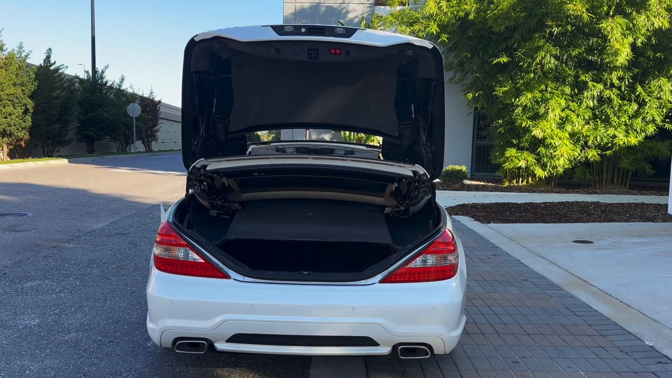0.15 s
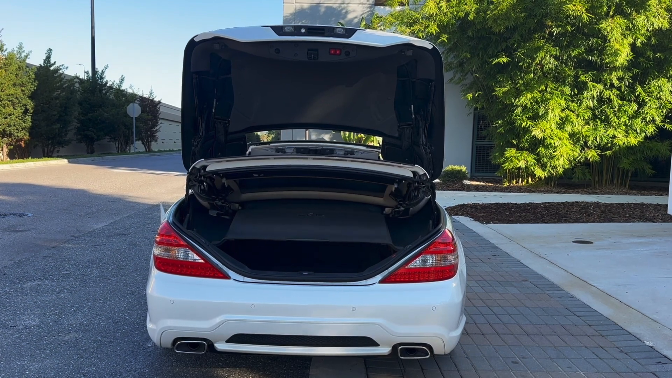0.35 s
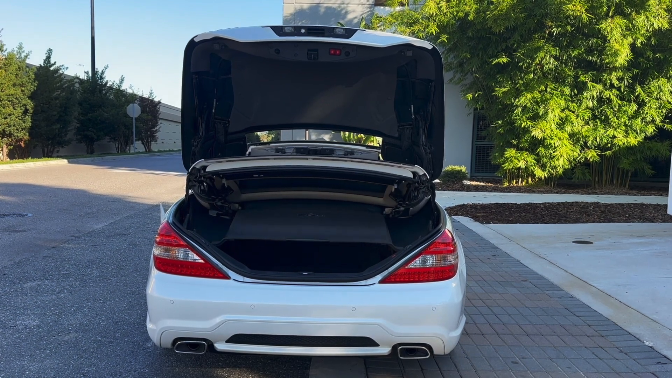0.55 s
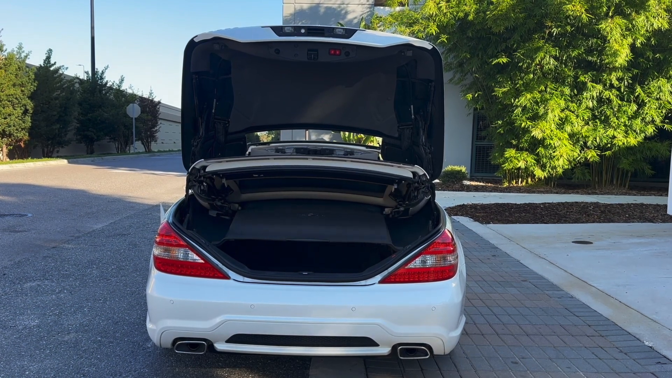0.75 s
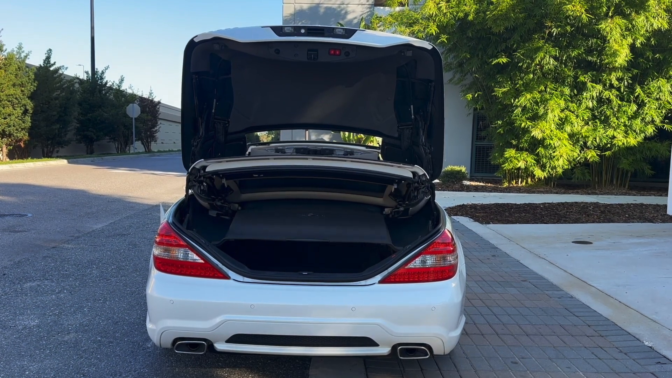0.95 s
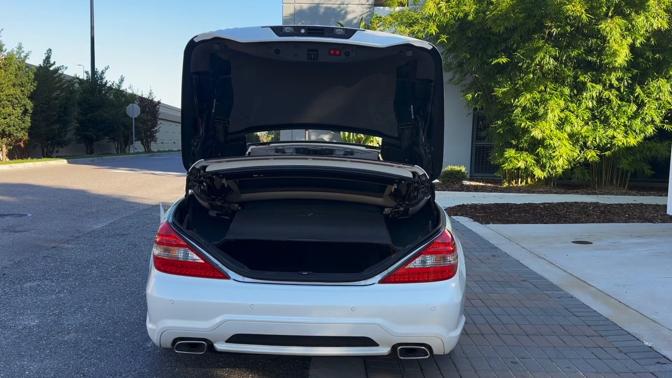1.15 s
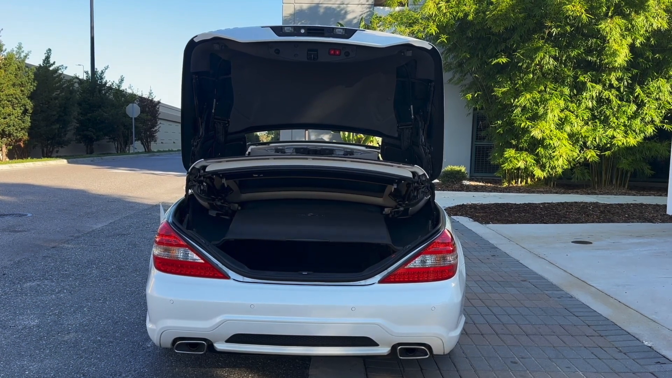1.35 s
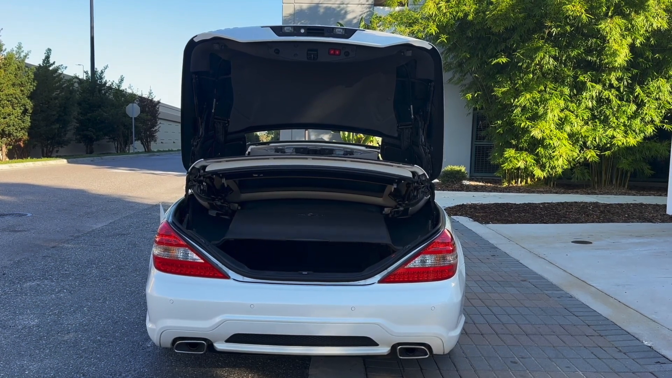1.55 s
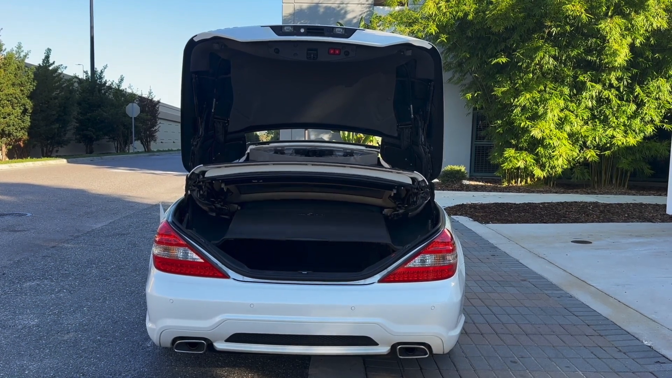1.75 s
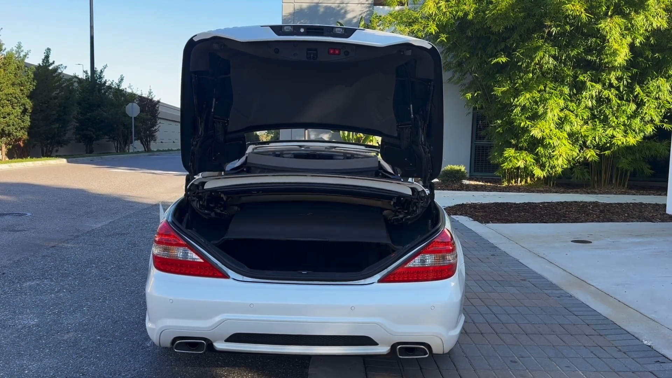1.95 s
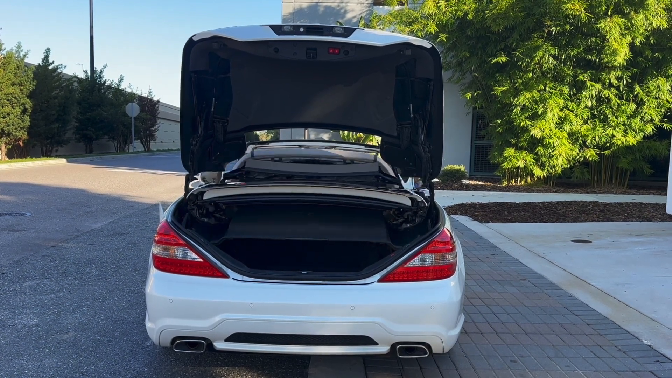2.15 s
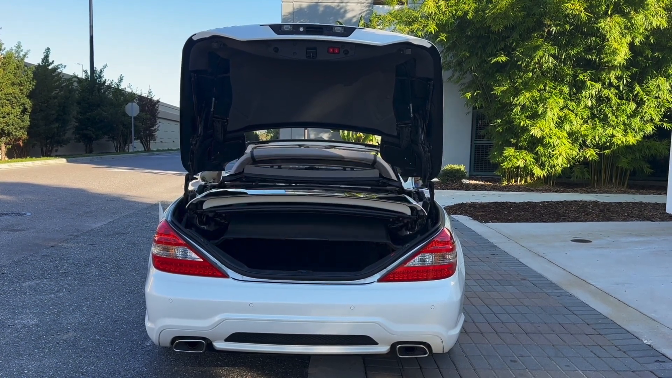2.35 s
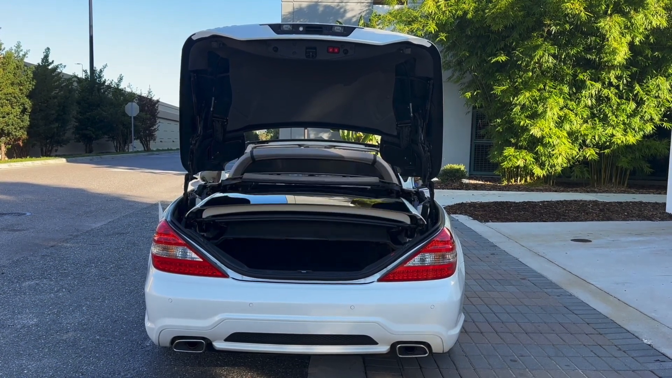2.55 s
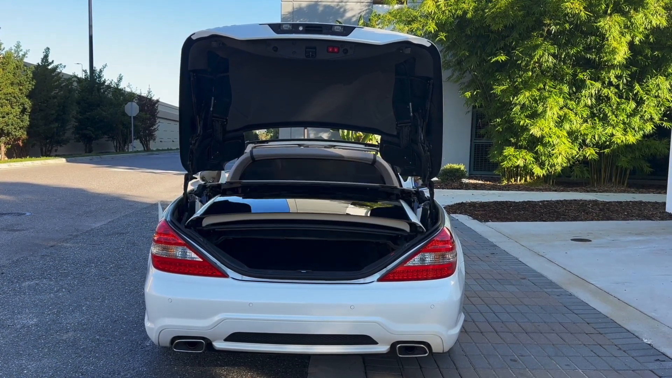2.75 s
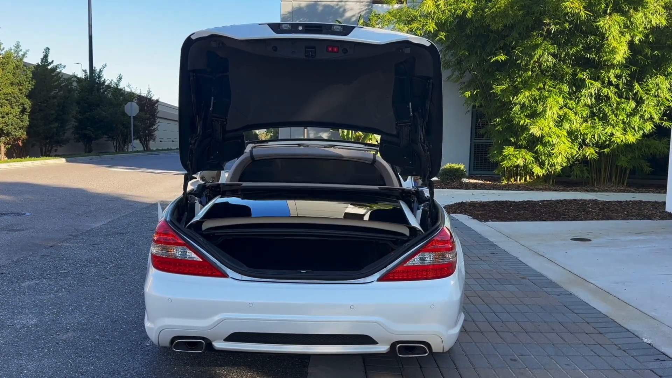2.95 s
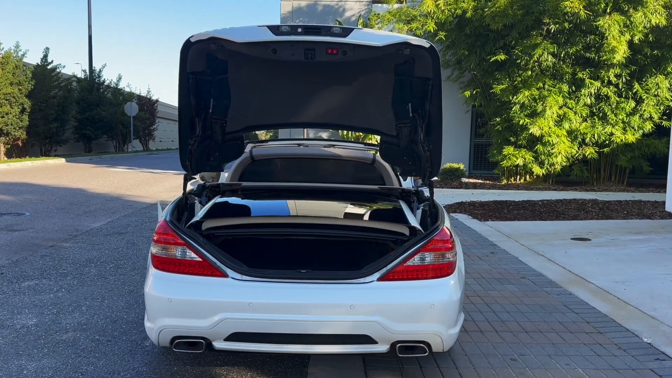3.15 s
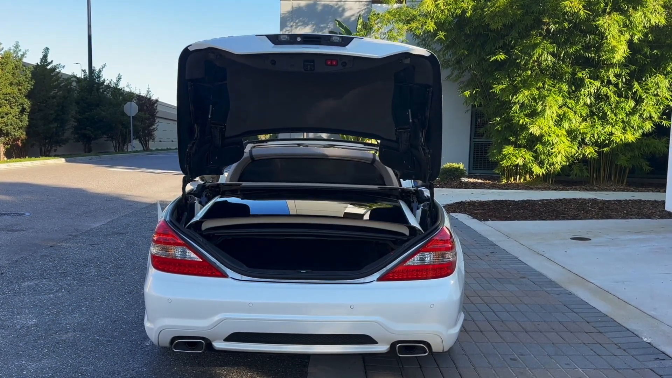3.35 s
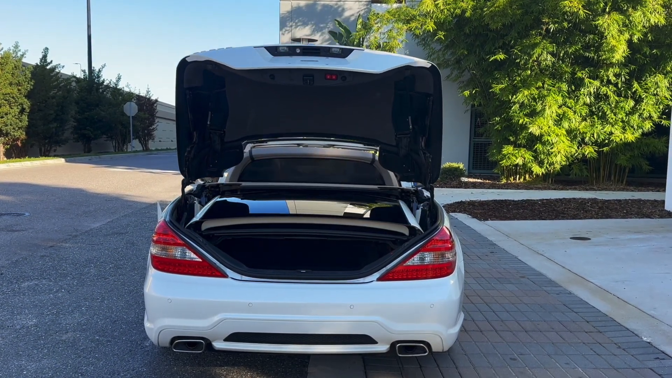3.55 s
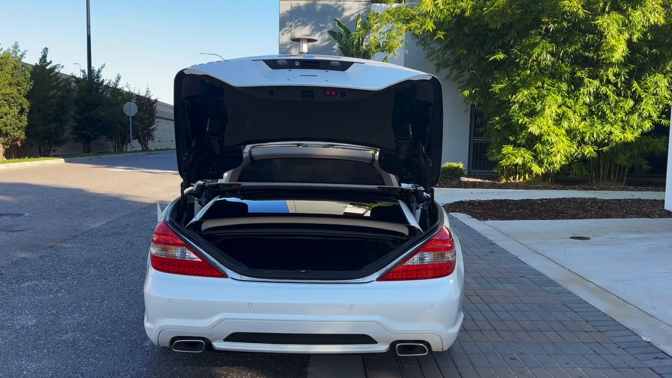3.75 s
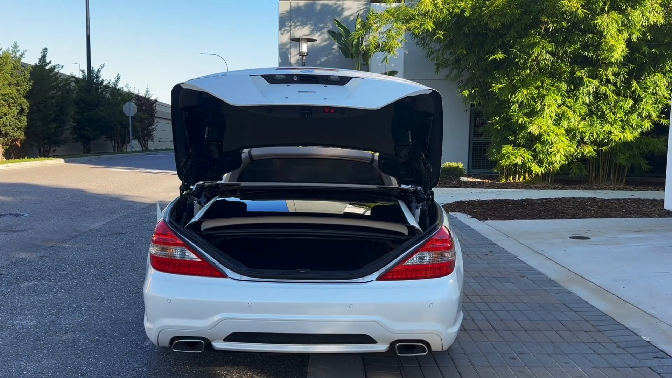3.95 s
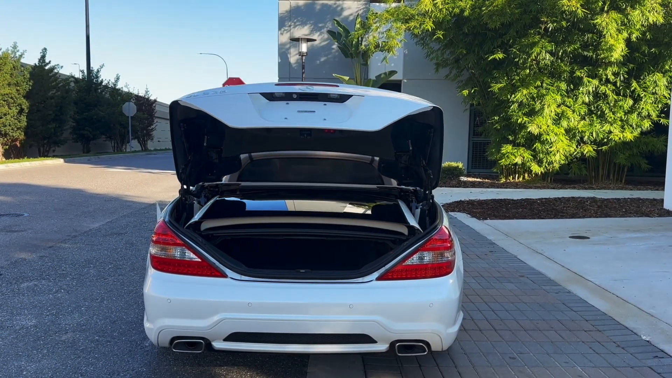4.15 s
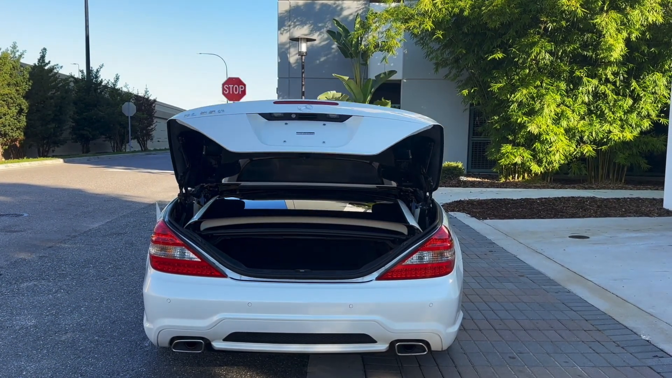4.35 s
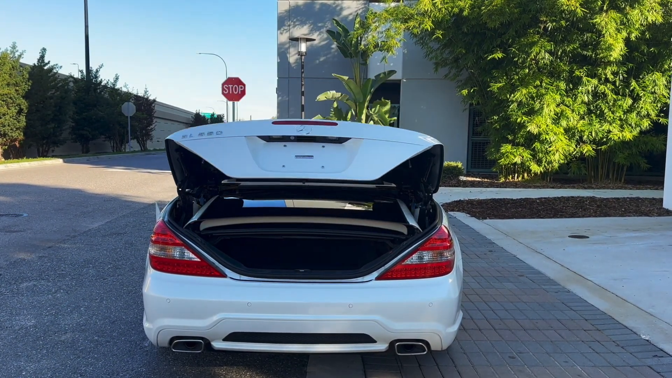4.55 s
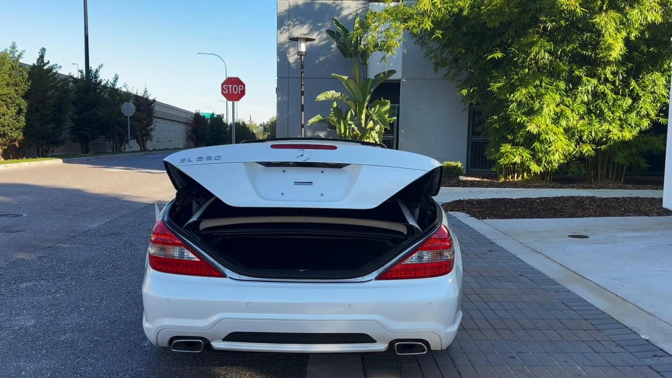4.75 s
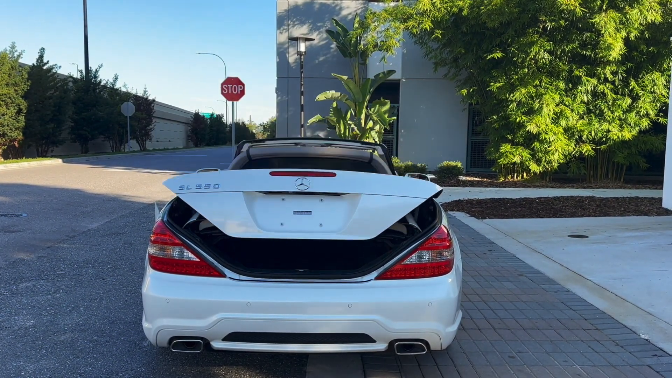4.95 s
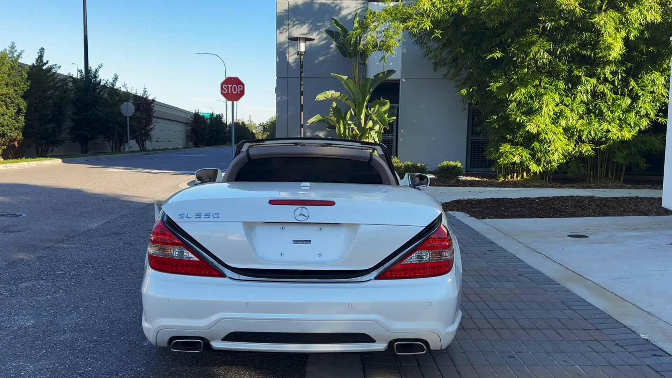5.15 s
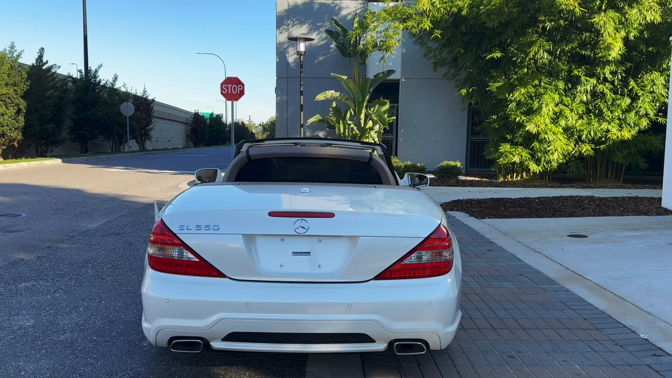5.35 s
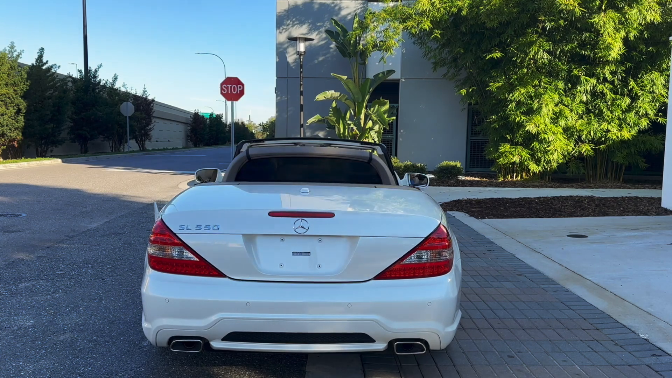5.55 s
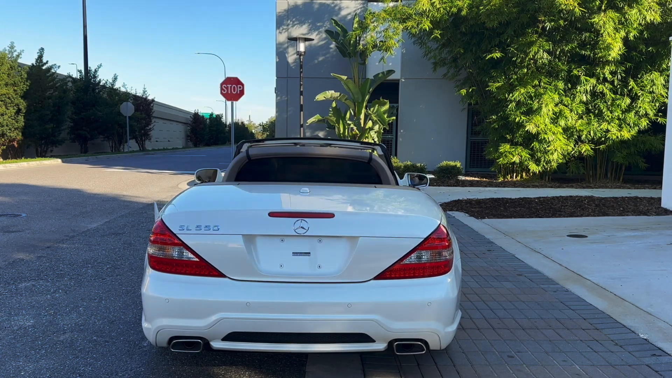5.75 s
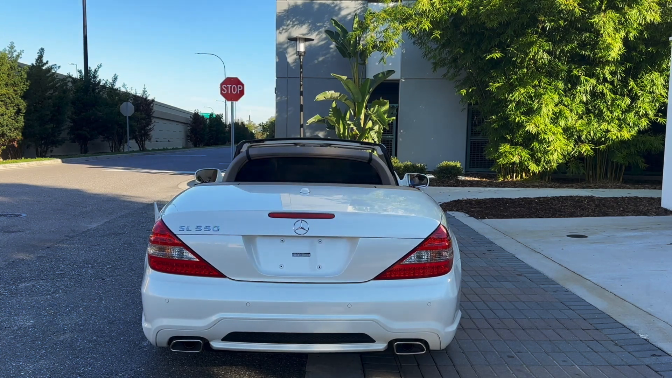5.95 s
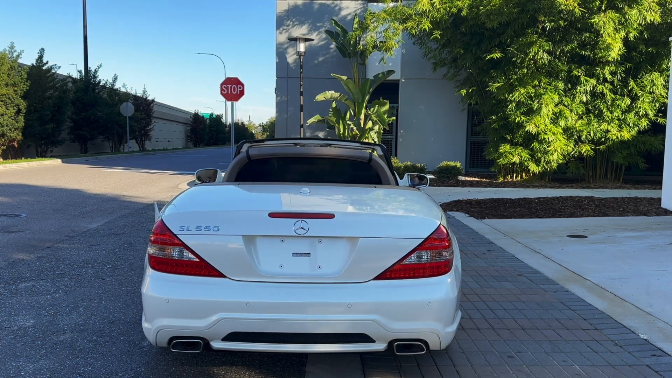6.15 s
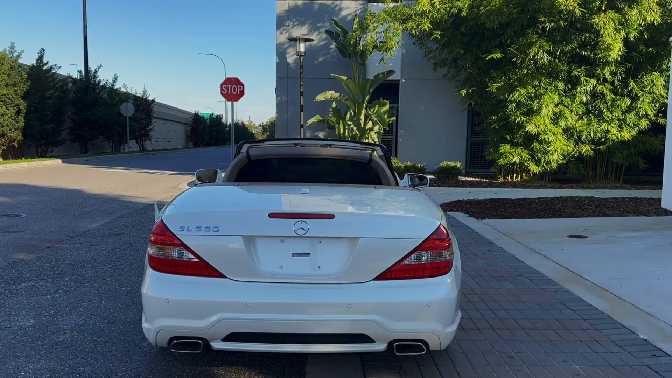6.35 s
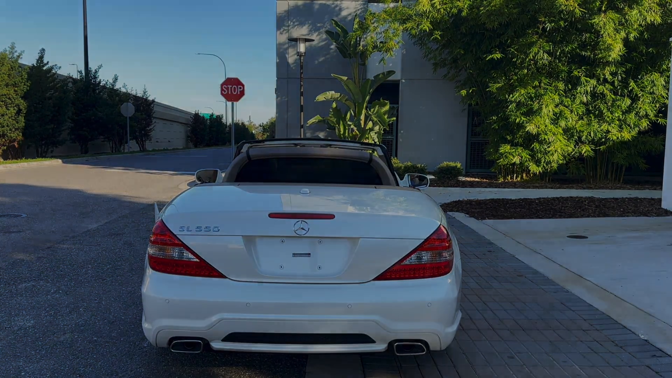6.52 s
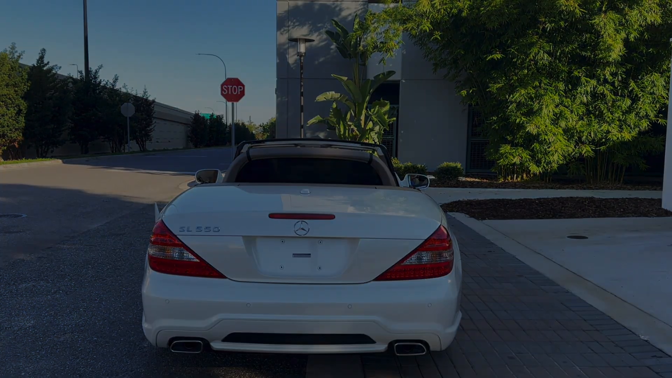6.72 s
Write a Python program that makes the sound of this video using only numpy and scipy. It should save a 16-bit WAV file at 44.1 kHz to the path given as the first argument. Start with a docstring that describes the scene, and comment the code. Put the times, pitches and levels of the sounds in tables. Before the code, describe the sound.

A low motor hum sags in pitch over a rumbling car idle outdoors, then a trunk lid slams with a deep thump and clicks once more.

```python
"""Convertible roof pump and trunk lid

A convertible idles in an open drive: a throbbing tone and shaped noise make the exhaust, fan and town air.
Its roof pump hums as a tone with an octave, sagging in pitch, beside an electric hum; the roof rubs as noise.
The trunk lid comes down: noise bursts click, decaying sines ring the latch, lid and body, and trim rattles.
A lock clicks a second later; a nearby wall answers faintly as a dying noise echo, and the end fades down."""
import sys
import numpy as np
from scipy import signal
from scipy.fft import rfft, irfft, next_fast_len
from scipy.io import wavfile
from scipy.ndimage import map_coordinates

SR = 44100
rng = np.random.default_rng(int(sys.argv[2]) if len(sys.argv) > 2 else 0)


def output_pcm(signal):
    """Save a mono or channel-first signal as 16-bit PCM at the path in sys.argv[1].

    Samples are clipped to [-1, 1] before scaling.
    """
    pcm = np.clip(np.atleast_2d(signal).T, -1, 1) * 32767
    wavfile.write(sys.argv[1], SR, np.round(pcm).astype(np.int16))


N = 303711
TIME_S = np.arange(N) / SR

# In every table, t60 is the time a sound takes to die away by 60 dB.


def amp(db):
    """Turn decibels into a gain."""
    return 10 ** (np.asarray(db) / 20)


def unit(x):
    """Scale a sound to an average strength (rms) of 1."""
    return x / np.sqrt(np.mean(x ** 2) + 1e-20)


def along(points, hz):
    """Read a value between (Hz, value) points, with frequency on a log scale."""
    f, v = np.transpose(points)
    return np.interp(np.log(hz + 1), np.log(f + 1), v)


def wobble(rate):
    """A smooth random curve with the given number of random points a second."""
    knots = rng.standard_normal(int(N * rate / SR) + 4)
    return map_coordinates(knots, [np.arange(N) * rate / SR])


def spell(start, end, ramp):
    """A curve that rises to 1 around start, holds, and falls to 0 around end."""
    return np.clip(np.minimum(TIME_S - start, end - TIME_S) / ramp + .5, 0, 1)


def swell(s, half_length):
    """A bell-shaped rise and fall that peaks at time s."""
    return np.exp(-((TIME_S - s) / half_length) ** 2)


def dying(start, t60, attack):
    """A curve that rises quickly at start and dies away."""
    t = np.maximum(TIME_S - start, 0)
    return (1 - np.exp(-t / attack)) * amp(-60 * t / t60)


def add(track, s, sound):
    """Mix a sound into a track at time s."""
    part = track[..., round(s * SR):][..., :sound.shape[-1]]
    part += sound[..., :part.shape[-1]]


def filtered(x, response):
    """Make each frequency stronger or weaker by a gain that depends on frequency."""
    size = x.shape[-1]
    m = next_fast_len(size + SR // 4)
    return irfft(rfft(x, m) * response(np.fft.rfftfreq(m, 1 / SR)), m)[..., :size]


def widen(pair, spectrum, direct):
    """Two noises become a coloured left and right; the direct share reaches both sides alike."""
    # How alike left and right are. Each row: frequency in Hz, likeness (-1 opposite to 1 the same).
    alike = [(60, 0.91), (150, 0.9), (290, 0.95), (450, 0.53), (640, 0.25), (1100, 0.19), (1400, -0.26),
             (1750, -0.18), (2300, 0.69), (3100, 0.076), (6000, 0.62), (8200, -0.86), (9500, 0.22),
             (11000, .85)]
    # How the sound leans to one side. Each row: frequency in Hz, left minus right in dB.
    lean = [(60, 1), (130, 2), (250, 2), (380, 0.5), (700, 4), (1290, 2), (2380, 0.5), (4400, 4.5),
            (8100, 1.5), (15000, -1.5)]

    def middle_and_side(hz):
        likeness = np.clip(direct + (1 - direct) * along(alike, hz), -1, 1)
        turn = np.arccos(likeness) / 2
        return amp(spectrum(hz)) * [np.cos(turn), np.sin(turn)]

    mid, side = filtered(pair, middle_and_side)
    stereo = np.array([mid + side, mid - side])
    return unit(filtered(stereo, lambda hz: amp(np.outer([.5, -.5], along(lean, hz)))))


def rush(spectrum):
    """Steady, diffuse stereo noise of rms 1, coloured by a spectrum."""
    return widen(rng.standard_normal((2, N)), lambda hz: along(spectrum, hz), direct=0)


def tone(hz, overtone_db):
    """A hum of rms about 1 that follows a pitch curve, with its octave."""
    phase = 2 * np.pi * (np.cumsum(hz) / SR + rng.random())
    return np.sqrt(2) * (np.sin(phase) + amp(overtone_db) * np.sin(2 * phase))


def ring(modes, attack):
    """A struck shell rings at several pitches; neighbours in the list swing in opposite directions."""
    t = np.arange(SR // 2) / SR
    swing = 0
    for k, (hz, db, t60) in enumerate(modes):
        swing = swing + (-1) ** (k + 1) * amp(db - 60 * t / t60) * np.sin(2 * np.pi * hz * t)
    return swing * (1 - np.exp(-t / attack))


def strike(modes, scatter_db=3.5):
    """A struck steel part: each blow shares its energy out anew, in a different mix on each side."""
    t = np.arange(SR // 4) / SR
    swing = 0
    for hz, db, t60 in modes:
        level_db = db + scatter_db * rng.standard_normal((2, 1)) - 60 * t / t60
        phase = 2 * np.pi * (hz * t + rng.random()) + .5 * rng.standard_normal((2, 1))
        swing = swing + amp(level_db) * np.sin(phase)
    return swing * (1 - np.exp(-t / .0004))


def idle_and_air():
    """The exhaust throbs at the firing rate under a wide rush of air and a faint hiss."""
    # Colours of the exhaust rumble, the air and the hiss. Each row: frequency in Hz, relative dB per Hz.
    rumble = [(20, -43.5), (32, -32), (42, -14), (58, -3), (75, 0), (105, -3.5), (145, -6.5), (180, -10),
              (230, -12), (300, -18), (360, -18), (500, -36), (1000, -80.5), (3000, -120)]
    air = [(100, -28), (250, -5), (370, -2.5), (720, 2), (900, -2), (1150, -7.5), (1350, -18), (1650, -15),
           (1900, -26.5), (2600, -28), (2900, -33), (4000, -39.5), (6000, -51.5), (12000, -73.5)]
    hiss = [(1500, -21.5), (4000, 1), (5500, -2.5), (7200, 1.5), (9400, 1.5), (10200, -6), (11000, -13),
            (14000, -18), (16000, -26.5)]
    # Brief swells of the rumble. Each row: peak in seconds, rise in dB, half-length in seconds.
    swells = [(6.352, 2.5, .16)]
    rumble_db = -37 + 0.5 * wobble(3.3) + sum(db * swell(s, half) for s, db, half in swells)
    firing = tone(44.2 + 0.5 * wobble(3.04), overtone_db=-20.5)
    throbbing = unit(rush(rumble) * (1 + 0.18 * firing))
    exhaust = amp(rumble_db) * throbbing + amp(-45.5 + 1.7 * wobble(4.9)) * firing
    return exhaust + amp(-42 + 0.34 * wobble(8)) * rush(air) + amp(-79) * rush(hiss)


def motors():
    """The pump slows; an electric hum nearly holds its pitch beside it and swells in spells."""
    # Moments when the pump eases off. Each row: middle in seconds, drop in dB, half-length in seconds.
    lulls = [(1.69, 10, .07), (2.6, 8, .1), (4.103, 11, 0.049)]
    # Spells of stronger electric hum. Each row: start in seconds, end in seconds, level in dB.
    hum_spells = [(-.2, 0.86, -41), (1.258, 2.553, -39.5), (3.003, 4.252, -43), (5.922, 6.902, -39)]
    start_hz, settled_hz, settle_s = 106.17, 84.53, 2.2
    hum_rest_db, hum_ramp_s = -52, 0.21
    octave_start_db, octave_rest_db = -51, -59.5

    pump_hz = settled_hz + (start_hz - settled_hz) * np.exp(-TIME_S / settle_s)
    # louder while it carries the roof and the lid, and weaker as it slows
    pump_db = -42.5 + 5.5 * spell(0.58, 5.8, ramp=0.31) - 0.5 * TIME_S
    lull_db = sum(db * swell(s, half) for s, db, half in lulls)
    pump_gain = amp(pump_db - lull_db + 1.9 * wobble(9))  # the load wavers
    pump = pump_gain * tone(pump_hz + 1.32 * wobble(9), overtone_db=-17)

    hum_hz = 119 + .25 * wobble(2.997)
    hum_gain = np.max([amp(db) * spell(start, end, hum_ramp_s) for start, end, db in hum_spells], axis=0)
    hum = np.maximum(hum_gain, amp(hum_rest_db)) * tone(hum_hz, overtone_db=-40)
    # the hum's octave is strongest at first, then drops back
    octave_db = octave_rest_db + (octave_start_db - octave_rest_db) * spell(-1, 1.5, hum_ramp_s)
    octave = amp(octave_db) * tone(2 * hum_hz, overtone_db=-20)
    return (pump + hum + octave) * amp([[.3], [-.3]])  # slightly louder on the left


def roof():
    """The sliding roof rubs softly in the hollow of the trunk, each rub swelling and ebbing."""
    # Rubs of the roof. Each row: peak in seconds, level in dB, half-length in seconds.
    rubs = [(2.847, -44.5, 0.072), (3.35, -50.5, 0.39), (4.015, -49, 0.26)]
    # Colour of the trunk's hollow. Each row: frequency in Hz, relative dB per Hz.
    hollow = [(180, -32.5), (300, 3), (370, 2), (480, 1.5), (750, -19), (2000, -61), (6000, -120)]
    rubbing = sum(amp(db) * swell(s, half) for s, db, half in rubs)
    return rubbing * amp(1.9 * wobble(11.0)) * rush(hollow)


def rattle(uneven_db=3.5):
    """Loose trim chatters unevenly, dying away, and knocks a few times as it comes to rest."""
    # Colour of the loose trim. Each row: frequency in Hz, relative dB per Hz.
    trim = [(800, -10), (1600, 6), (3400, 1), (4500, -16), (7500, -17), (10000, -23), (15000, -42)]
    # Knocks of the trim. Each row: start in seconds, level in dB.
    trim_knocks = [(5.277, -64), (5.3, -65), (5.323, -62)]
    chatter = unit(amp(uneven_db * wobble(160)))
    settling = amp(-61.5) * dying(4.9, t60=0.42, attack=.005) * chatter
    knocks = sum(amp(db) * dying(s, t60=.06, attack=.001) for s, db in trim_knocks)
    return (settling + knocks) * rush(trim)


def latches(octaves=0.32, grain_db=1.5):
    """Catches snap with gritty, quickly dying bursts, each with its own resonance; latch and linkage ring."""
    # Catches, linkage and locks. Each row: start in seconds, level in dB, tilt from dull to bright
    # in dB per octave, t60 in seconds, own resonance in Hz, boost at that resonance in dB.
    clicks = [(1.722, -75, 8, .021, 11000, 2), (2.6445, -77, 11, .03, 12500, 5),
              (3.0945, -61, 2, .02, 12700, 13), (3.0952, -53, 0, .018, 4400, 9),
              (3.0985, -55, 1.5, 0.026, 3400, 10), (5.157, -59, -1, .018, 4000, 25),
              (5.1833, -46.5, 3, .02, 15000, 11), (5.1847, -42, -0.5, .06, 5500, 0),
              (5.196, -33.5, 1.7, 0.025, 3300, 0), (5.1996, -31.5, -3, 0.043, 2800, 3),
              (5.214, -50, 0.5, .04, 3300, 9), (5.221, -47, -1, 0.049, 9500, 5),
              (6.0922, -44.5, 2, 0.026, 5600, 3), (6.0945, -43.5, 1.5, .038, 9500, 4),
              (6.104, -56, 1, .03, 9200, 6), (6.1145, -57, -0.5, .06, 10500, 5)]
    # Colour of the latch steel. Each row: frequency in Hz, relative dB per Hz.
    steel = [(300, -10), (1100, 3), (1750, 2.5), (2050, 3), (2800, -5), (4200, -13), (5400, -13),
             (8000, -20), (10000, -15), (12000, -28.5), (15500, -27)]
    # Ringing of the latch, then of the roof linkage locking home.
    # Each row: frequency in Hz, relative level in dB, t60 in seconds.
    latch = [(870, 0, .055), (1010, -3, .05), (1230, 1, .05), (1420, -5, .055), (1765, -11, .05),
             (2005, -2.5, .052), (2120, -8, 0.048), (2470, -4, .04), (2800, -12, .04), (3500, -16, .04),
             (4240, -22, .045), (4575, -20, .045), (4965, -22, .04), (5480, -18.5, .04)]
    linkage = [(2180, -4, .04), (3340, 1, .045), (4300, -4, .025)]
    # Blows on the latch, by the slam and again by the lock. Each row: start in seconds, level in dB.
    blows = [(5.186, -51), (5.199, -37), (5.2074, -45), (6.096, -44)]
    out = np.zeros((2, N))
    t = np.arange(SR // 4) / SR
    for s, db, tilt_db, t60, own_hz, boost_db in clicks:
        def colour(hz):
            tilt = tilt_db * np.log2(np.maximum(hz, 1000) / 3000)
            peak = boost_db * np.exp(-(np.log2((hz + 1) / own_hz) / octaves) ** 2)
            return along(steel, hz) + tilt + peak

        burst = widen(rng.standard_normal((2, len(t))), colour, direct=0.43)
        grit = unit(amp(grain_db * wobble(900)[:len(t)]))
        envelope = amp(db - 60 * t / t60) * (1 - np.exp(-t / 0.00036))
        add(out, s, envelope * grit * burst)
    for s, db in blows:
        add(out, s, amp(db) * strike(latch))
    add(out, 3.0962, amp(-58.5) * strike(linkage))
    return out


def lid():
    """Striker knocks, the skin slaps and flexes, the seal thuds, the body booms, trunk and cabin follow."""
    # Ringing of the lid's skin, then of the trunk and body, then of the cabin air, which drones on.
    # Each row: frequency in Hz, level in dB (relative for skin and body), t60 in seconds.
    panel = [(292, -11.5, 0.06), (377, -4, 0.05), (498, 2.5, 0.09), (600, -9, 0.063), (760, -1, 0.034),
             (863, -9.5, 0.086), (1040, -17, 0.055), (1420, -16, 0.05)]
    body = [(51, -8, .25), (88, 0, .067), (120, -5.8, .068), (130, -3.5, .03), (232, -9, .03)]
    cabin = [(79.2, -29.5, 1)]
    # Colours of the squeezed rubber seal, the trunk's hollow blooming under the boom, and the dull knocks.
    # Each row: frequency in Hz, relative dB per Hz.
    seal = [(60, -26.5), (140, -5), (230, -4), (330, -4), (600, -6), (1200, -22), (4000, -60)]
    bloom_colour = [(60, -24.5), (100, -3.5), (140, -0.5), (175, -5), (230, -2.5), (275, -3), (330, -19),
                    (600, -65)]
    knock_colour = [(100, -18), (190, 3), (400, -4), (700, -6), (1200, -16), (3000, -50)]
    # Knocks as the striker touches and the lock pulls home. Each row: start in seconds, level in dB.
    lid_knocks = [(5.19, -33), (6.095, -36)]
    shell = np.zeros(N)
    add(shell, 5.2012, amp(-26.5) * ring(panel, attack=0.0004))
    add(shell, 5.2078, amp(-26.5) * ring([(228, 0, 0.14)], attack=0.0025))  # the whole lid flexes
    add(shell, 5.2127, amp(-5.3) * ring(body, attack=.0008))
    add(shell, 5.24, ring(cabin, attack=0.014))
    thud = amp(-33) * dying(5.203, t60=0.23, attack=.004) * rush(seal)
    bloom = amp(-27.5) * dying(5.22, t60=.3, attack=.008) * rush(bloom_colour)
    knocking = sum(amp(db) * dying(s, t60=0.071, attack=0.0012) for s, db in lid_knocks)
    return shell * amp([[.4], [-.4]]) + thud + bloom + knocking * rush(knock_colour)


def wall(x, delay=0.008):
    """The nearby wall's scattered answer: delayed noise in which each frequency dies at its own speed."""
    # How long the answer lasts. Each row: frequency in Hz, t60 in seconds.
    decay = [(100, 0.37), (2800, 0.28), (6000, 0.24), (14000, 0.15)]
    hz, t, z = signal.stft(rng.standard_normal((2, SR // 2)), SR, nperseg=256)
    fading = amp(-60 * t / along(decay, hz)[:, None])
    tail = signal.istft(z * fading, SR, nperseg=256)[1]
    late = np.pad(x, ((0, 0), (round(delay * SR), 0)))
    return signal.fftconvolve(late, tail / np.linalg.norm(tail[0]), axes=1)[:, :N]


def scene():
    """The running car, the moving roof, and the closing lid with its echo."""
    background = idle_and_air() + motors() + roof()
    snaps = rattle() + latches()
    thump = lid()
    echo = wall(amp(-14.0) * snaps + amp(-24.5) * thump)
    return background + snaps + thump + echo


def record(dry):
    """Fade the end down and remove the lowest and highest frequencies."""
    fade_from_s, fade_db_per_s, top_hz = 6.42, 18.5, 15760
    fade_db = -fade_db_per_s * np.maximum(TIME_S - fade_from_s, 0)

    def band(hz):
        return np.clip((top_hz - hz) / 300 + .5, 0, 1) * np.clip((hz - 20) / 18, 0, 1)

    return filtered(dry * amp(fade_db), band)


dry = scene()
out = record(dry)
output_pcm(out)
```